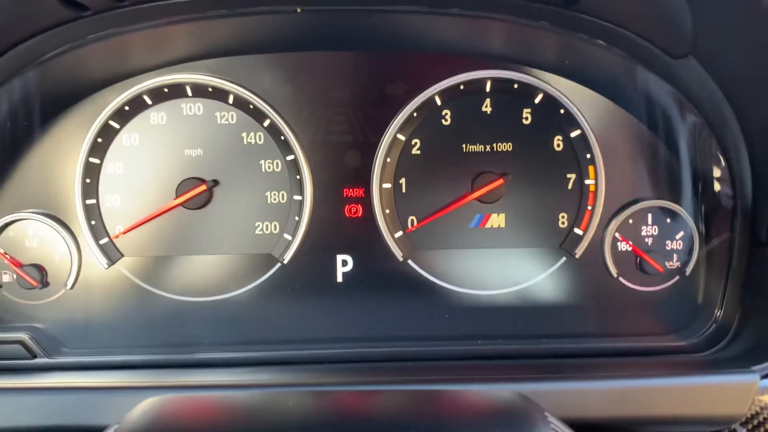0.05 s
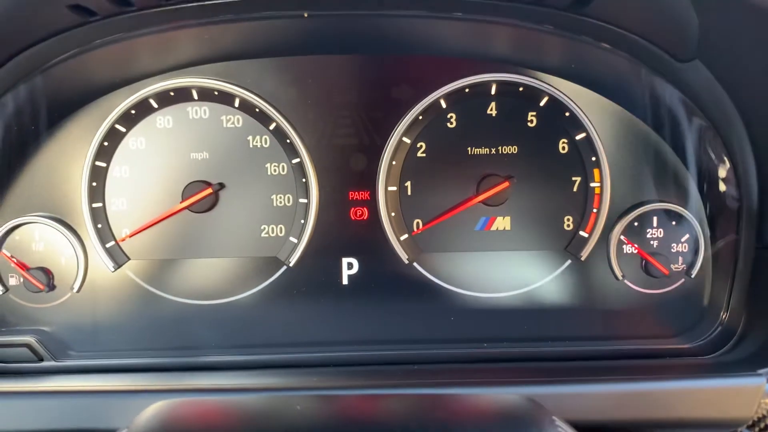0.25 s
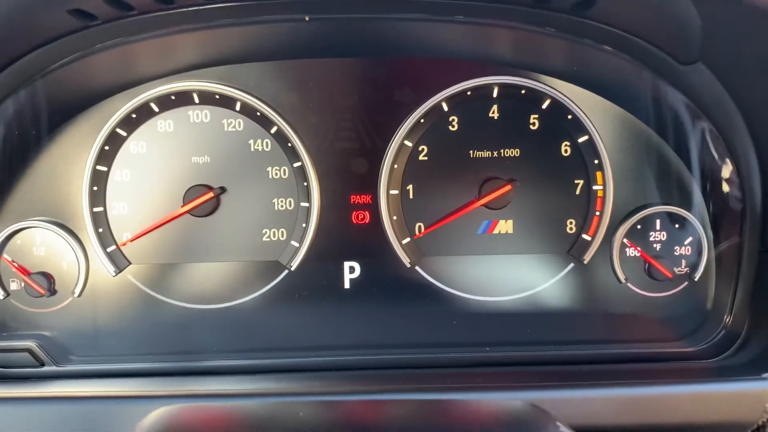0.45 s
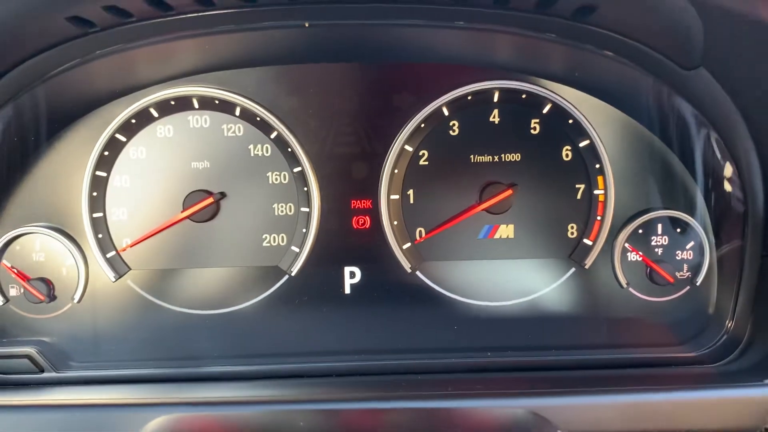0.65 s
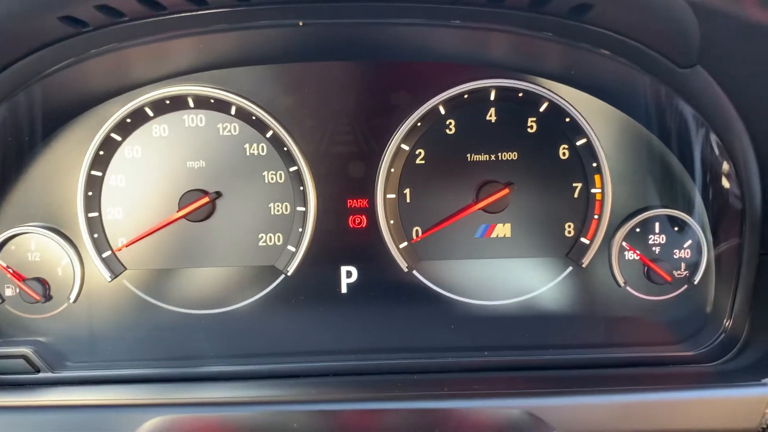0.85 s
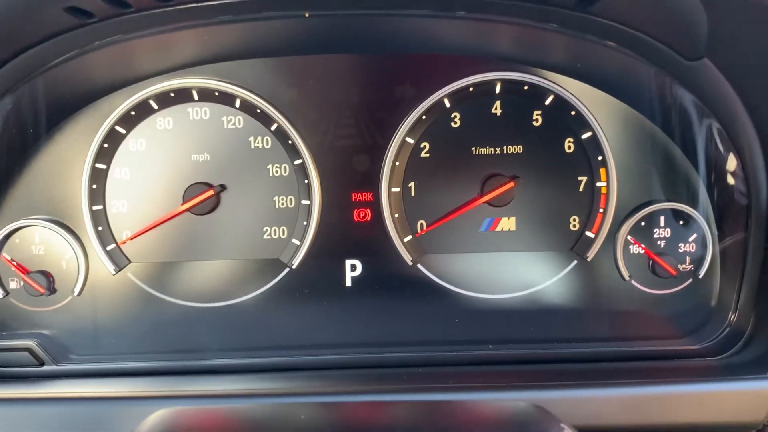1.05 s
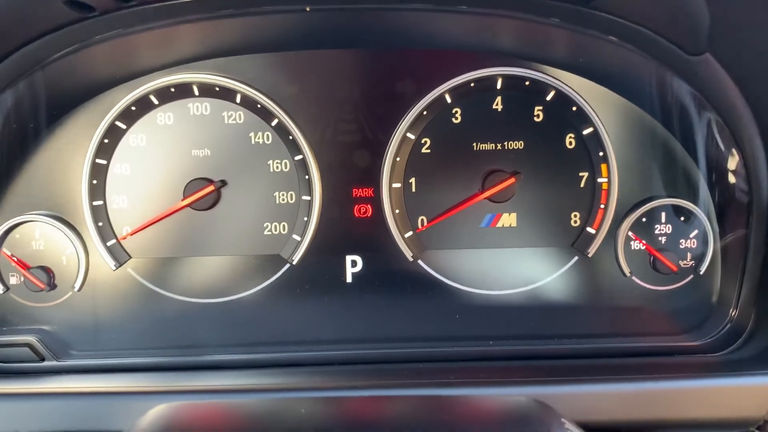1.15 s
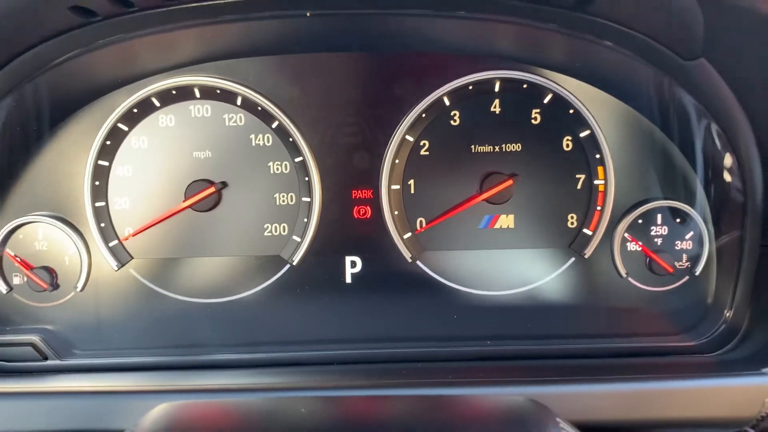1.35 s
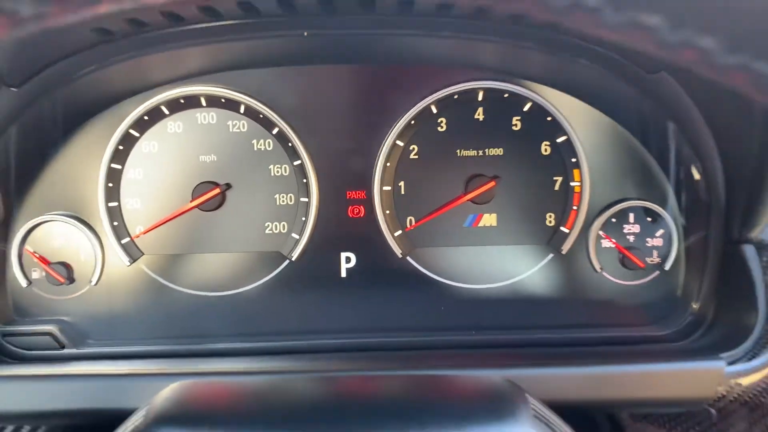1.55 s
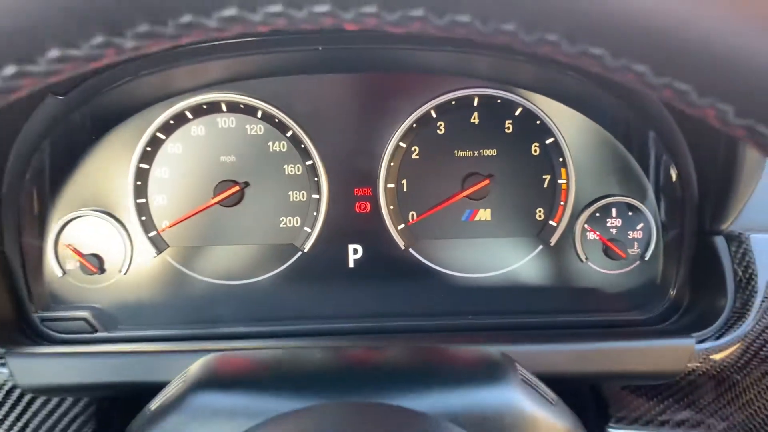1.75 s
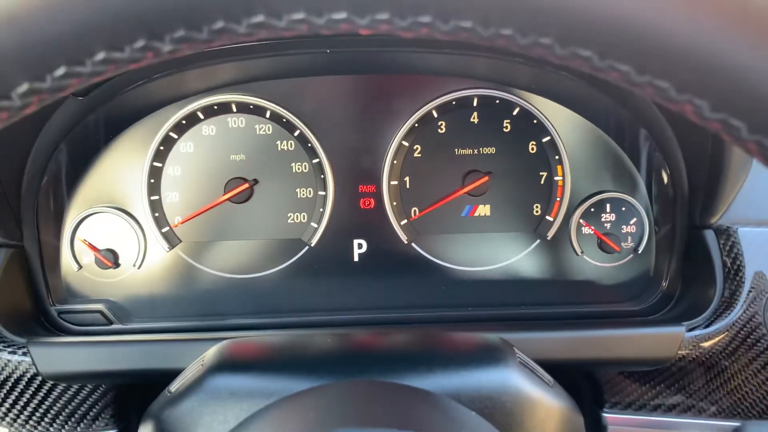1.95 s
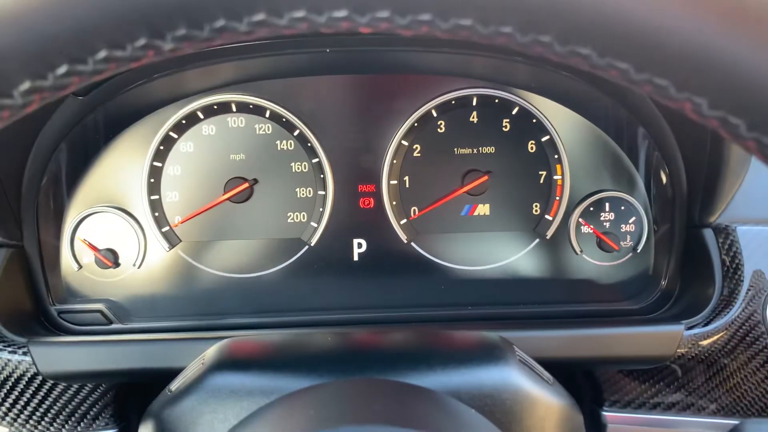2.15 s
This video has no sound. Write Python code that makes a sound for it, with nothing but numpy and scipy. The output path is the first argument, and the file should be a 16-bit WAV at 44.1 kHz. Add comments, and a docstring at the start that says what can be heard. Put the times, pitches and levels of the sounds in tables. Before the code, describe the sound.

Close plastic clacks and clicks come from a lever handled in a small, padded car cabin. A faint sleeve swish leads into a thump, clacks, a short slide and a final click, then soft knocks and low hum.

```python
"""A sleeve swishes past inside a parked car. A plastic lever and its latch release with a thump and
two clacks; the part slides briefly along a guide and clicks into its socket; a few soft knocks follow.
Each contact rings the part it strikes and scatters off the close cabin surfaces, while pushes boom the
trim panel. Cloth and slide are rubbing noise that catches and slips. Underneath, a low hum, a rumble
and faint hiss fill the small, padded cabin."""
import sys
import numpy as np
from scipy import signal
from scipy.io import wavfile

SR = 44100
rng = np.random.default_rng(int(sys.argv[2]) if len(sys.argv) > 2 else 0)


def transcribe(u):
    """Save the signal u as a 16-bit wav file named by the first command-line argument.

    u: samples, shape (n,) or (channels, n), limited to [-1, 1]; the rate is SR.
    q: integer samples, one column per channel.
    """
    v = np.clip(np.atleast_2d(u).T, -1, 1)
    q = np.round(v * 32767).astype(np.int16)
    wavfile.write(sys.argv[1], SR, q)


N = 97020
TIME = np.arange(N) / SR

# Plastic contacts: start_s, part, knock_db, clack_db, edge_db, tick_db, t60_s, edge_hz, edge_ring_db
CONTACTS = [(0.2553, "lever", -46.5, -37, -41, -53.5, 0.1, 2850, 8),
            (0.2655, "lever", -48, -47.5, -51, -63, 0.036, 1405, 7.5),
            (0.282, "lever", -50, -52, -80, -83, 0.049, 1420, 1),
            (0.2984, "latch", -41, -35, -38.5, -39.5, 0.04, 1745, -3),
            (0.3013, "latch", -46, -44, -39.5, -42.5, 0.035, 3560, 0),
            (0.3072, "latch", -45, -63, -42, -56, 0.1, 4020, 5.5),
            (0.384, "guide", -47, -66, -80, -90, 0.087, 1090, 9.5),
            (0.4278, "guide", -56, -34, -45, -50, 0.053, 2040, -1.5),
            (0.434, "guide", -62, -44, -53, -59, 0.059, 1480, 2),
            (0.465, "guide", -74, -54, -72, -68, 0.024, 2110, -1),
            (0.4758, "guide", -53, -53.5, -76, -80, 0.03, 2200, -8),
            (0.486, "guide", -55.5, -49, -59.5, -79, 0.1, 1500, 5),
            (0.529, "guide", -51.5, -68, -76, -90, 0.093, 970, 1),
            (0.559, "guide", -80, -70, -70, -81, .05, 2900, 7),
            (0.632, "socket", -51, -35, -43.5, -56, 0.084, 2550, 2.5),
            (0.7765, "socket", -53, -58, -78.5, -77, 0.1, 936, 7),
            (0.815, "socket", -57, -70, -70, -80, 0.24, 1045, 11.5),
            (0.9319, "socket", -51.5, -53.5, -105, -86, 0.085, 760, 3),
            (0.980, "socket", -61.5, -72.5, -97, -92, 0.036, 830, 8)]
# Where knock, clack, edge and tick sit in the spectrum: centre_hz
REGISTERS = [600, 2000, 4500, 9000]
# The voice of each part (lever, latch, guide, socket): pitch_hz, level_db, t60_s
PART_MODES = { "lever": [(438, 5.5, 0.05), (570, 0, 0.075), (787, 0, .1), (1080, -7.5, 0.15),
              (1346, -0.5, 0.13), (1680, -4.5, .08), (2244, -4, .07), (2570, -4, 0.05), (2920, -15, 0.06),
              (3270, -7, 0.043), (3770, -4, .08), (4700, -10.5, 0.16)], "latch": [(616, 2, 0.035),
              (753, -5, 0.068), (1400, -2, 0.065), (1470, -3, .08), (1780, -16, 0.037), (2072, -0.5, 0.04),
              (2230, -5, .045), (2600, -7, 0.037), (3400, -6, .05), (3546, -2.5, 0.051),
              (4130, -7.5, 0.043), (5650, -2, .045), (8000, -10, 0.066), (9170, -2.5, 0.035),
              (13100, -6, .025), (13900, -11, .02)], "guide": [(936, 1, 0.054), (1398, 2, 0.068),
              (1518, 2.5, .055), (1765, -7, 0.049), (2067, -2.5, 0.054), (2190, -9, 0.076),
              (2438, -8, 0.082), (2780, -9, 0.049), (3480, -12, 0.046), (4000, -2.5, 0.063),
              (4760, -5.5, 0.064), (5230, -9, 0.055)], "socket": [(430, -6.5, 0.12), (772, 3.5, 0.067),
              (1004, -5, 0.082), (1286, -8, 0.044), (1411, -5.5, 0.089), (1650, -4, 0.043),
              (1945, -8.5, .05), (2158, -0.5, 0.05), (2337, -4, .055), (2880, -2.5, 0.062),
              (3360, -15, 0.05), (3670, -9, 0.043), (4400, -7, 0.066), (6300, 5, 0.03)]}
# Stereo placement of the contacts: frequency_hz, left_minus_right_db
CONTACT_PAN = [(300, 1), (800, 4.5), (1400, 2), (2300, 4.5), (4500, -1), (10000, -2.5)]
def plastic_rings(chatter_s=0.001575, edge_t60_s=0.037, lag_s=0.00018, max_lag_cycles=0.22):
    """Each contact rings the part it strikes; the touching edge hits just after and adds its own note."""
    rings = []
    for part, modes in PART_MODES.items():
        for hz, db, t60 in modes:
            rings.append((hz, from_db(db) * ring(strikes(part, hz), hz, t60)))
    for k, (start_s, *_, hz, db) in enumerate(CONTACTS):
        edge_hit = signal.unit_impulse(N, int((start_s + chatter_s) * SR))
        rings.append((hz, from_db(db) * strengths(hz)[k] * ring(edge_hit, hz, edge_t60_s)))
    out = 0
    for hz, left in rings:
        right = np.interp(TIME - min(lag_s, max_lag_cycles / hz), TIME, left)  # arrives a little later
        out = out + pan(at_hz(CONTACT_PAN, hz)) * [left, right]
    return out


def strengths(hz):
    """How hard each contact excites this frequency."""
    return from_db([at_hz(list(zip(REGISTERS, levels)), hz) for _, _, *levels, _, _, _ in CONTACTS])


def strikes(part, hz, settle_s=0.002):
    """One impulse per contact on this part, randomly late and signed, so its modes start one by one."""
    train = np.zeros(N)
    for (start_s, struck, *_), strength in zip(CONTACTS, strengths(hz)):
        wait, side = rng.random(2)
        if struck == part:
            train[int((start_s + settle_s * wait) * SR)] = strength * np.sign(side - .5)
    return train


# The plastic tone of every noise burst: frequency_hz, level_db
PLASTIC_EQ = [(250, 0.5), (500, 1.5), (770, 1.5), (1150, 0.5), (1500, 4), (2100, 2), (2800, 4.5), (4000, 3),
              (5600, 0), (7000, 0), (8800, 8), (10300, 7), (13500, -26), (15500, -18)]
# Stereo width of the bursts and the rubbing: frequency_hz, left_right_likeness
CONTACT_WIDTH = [(250, -0.035), (700, 0.97), (1400, -0.02), (4000, -0.066), (9000, 0.15)]
def plastic_scatter(gain_db=-4.5, rise_s=0.00042, hold_s=0.0028, tail_db=-26.5, tail_t60_s=0.42):
    """Each contact scatters off close surfaces as a noise burst, trailed by the faint cabin after-ring."""
    starts, *_, t60s, _, _ = map(np.array, zip(*CONTACTS))
    ages = np.maximum(TIME - starts[:, None], 0)
    rise = np.minimum(ages / rise_s, 1)
    tail_power = from_db(tail_db - 60 * ages / tail_t60_s) ** 2
    decay = np.log(1e6) * np.maximum(ages - hold_s, 0) / t60s[:, None]
    out = 0
    for hz, noise in noise_bands(CONTACT_WIDTH, PLASTIC_EQ[0][0]):
        damping = max(hz / 2000, 1) ** 0.087  # treble dies sooner
        burst_power = np.exp(-np.minimum(decay * damping, 20))
        envelope = np.sqrt(strengths(hz) ** 2 @ (rise * (burst_power + tail_power)))
        gain = from_db(gain_db + at_hz(PLASTIC_EQ, hz)) / 2
        out = out + gain * pan(at_hz(CONTACT_PAN, hz)) * envelope * rms_one(noise)
    return out


# Pushes on the trim: centre_s, level_db, contact_s, ring_time_ratio
PUSHES = [(0.1988, -23.5, 0.0081, 2.5), (0.2494, -23, 0.0025, 0.71), (0.2545, -20.5, 0.0033, 0.78),
          (0.2612, -20, 0.0053, 1.43), (0.278, -31, 0.0052, 0.27), (0.3018, -27, 0.0042, 0.48),
          (0.308, -9.5, 0.0063, 0.08), (0.319, -42, 0.0017, 1.5), (0.3315, -23.5, 0.0065, 0.43),
          (0.640, -44.5, 0.0023, 1.3)]
# The boom of the trim panel: pitch_hz, level_db, t60_s
TRIM_MODES = [(62, -19, 0.073), (129.3, 2.5, 0.068), (188, -8, 0.073), (260.6, -0.5, 0.059),
              (417.4, -13.5, 0.18), (572, -14, 0.076)]
def trim_thumps():
    """Soft pushes set the trim panel booming; a firm grip damps it."""
    boom = 0
    for centre_s, push_db, contact_s, ring_time_ratio in PUSHES:
        push = np.cos(np.pi * np.clip((TIME - centre_s) / contact_s, -.5, .5)) ** 2
        push /= push.sum()
        for hz, mode_db, t60 in TRIM_MODES:
            boom = boom + from_db(push_db + mode_db) * ring(push, hz, t60 * ring_time_ratio)
    return pan(2.5) * low_cut(boom, hz=73)  # the thumps' deepest bass is rolled off


# The slide's fader moves: time_s, level_db
SLIDE_FADER = [(0.245, -73.5), (0.272, -53), (0.33, -55.5), (0.415, -58.5), (0.45, -49), (0.49, -60.5),
               (0.52, -68.5), (0.60, -68.5), (0.72, -71.5), (0.95, -79)]
# The tone of the part on its guide: frequency_hz, level_db
SLIDE_EQ = [(180, -36), (300, -12.5), (1080, -2), (1250, -22), (1520, -2), (1650, -7), (4930, -13.5),
            (11000, -28), (13800, -39), (15000, -61)]
def guide_slide():
    """The part rubs along its guide between the clacks."""
    return fader(SLIDE_FADER) * friction(SLIDE_EQ, grain_db=-2.5, grain_hz=112) * pan(2.2)


# The bright tone of cloth: frequency_hz, level_db
SLEEVE_EQ = [(1500, -16), (3000, -4), (4700, -1), (7200, 1), (8300, 2), (9500, -1), (11300, -1),
             (13200, -1), (15000, -1)]
def sleeve_brush(start_s=0.0224, attack_s=0.011, hold_s=0.036, release_s=0.04, gain_db=-56.5):
    """Cloth lands at about half strength and rubs past in one short swish."""
    corners = start_s + np.cumsum([0, attack_s, hold_s, release_s])
    envelope = np.interp(TIME, corners, [0.49, 1, 1, 0], left=0)
    return from_db(gain_db) * envelope * friction(SLEEVE_EQ, grain_db=2.0, grain_hz=248)


# The hum's swells and dips: time_s, level_db
HUM_FADER = [(0.0, -50), (0.08, -51.5), (0.12, -65), (0.26, -46), (0.64, -46), (0.67, -71.5), (0.99, -38.5),
             (1.06, -62), (1.11, -42.5), (1.18, -46), (1.2, -50), (1.36, -43.5), (1.39, -54.5),
             (1.49, -42.5), (1.52, -52), (2.2, -49)]
def cabin_hum(pitch_hz=49, wander_hz=2.67):
    """One low tone that wavers in pitch as it swells and dips."""
    phase = 2 * np.pi * np.cumsum(pitch_hz + wander_hz * drift(rate_hz=6.03)) / SR
    return fader(HUM_FADER) * rms_one(np.sin(phase))


# The bass-heavy room tone: frequency_hz, level_db
AIR_EQ = [(22, -25), (50, -9.5), (82, -11), (113, -11.5), (145, -16.5), (218, -25), (408, -35.5),
          (765, -39), (1300, -46), (2000, -49.5), (3200, -58), (6500, -65), (10000, -57.5), (15000, -63)]
# The rumble's fader moves: time_s, gain_db
RUMBLE_FADER = [(0, -49), (0.2, -48), (0.4, -42.5), (0.52, -50), (0.7, -48), (1.1, -50), (1.75, -48),
                (1.87, -45), (1.98, -50), (2.2, -53)]
# Room tone width, narrow in the bass and wide on top: frequency_hz, left_right_likeness
AIR_WIDTH = [(40, 0.93), (150, 0.92), (300, 0.65), (600, 0.64), (3000, 0.59), (12000, 0.24)]
def cabin_air(rumble_top_hz=400, hiss_gain_db=-52.5):
    """A bed of noise: the rumble rises and falls under a faint, steady hiss."""
    bands = [(hz, from_db(at_hz(AIR_EQ, hz)) * noise) for hz, noise in noise_bands(AIR_WIDTH, AIR_EQ[0][0])]
    rumble_gain, hiss_gain = fader(RUMBLE_FADER), from_db(hiss_gain_db)
    air = sum((rumble_gain if hz < rumble_top_hz else hiss_gain) * noise for hz, noise in bands)
    return air / np.std(sum(noise for _, noise in bands))


# Treble peaks and dips of the microphone ports: centre_hz, gain_db, width_hz
PORT_EQ = [(7240, -4.5, 1500), (8440, 3.5, 2000), (11490, -32.5, 690), (13100, 3.5, 3600)]
def microphone(x):
    """The ports colour the treble, one bell filter for each peak or dip."""
    for hz, db, width_hz in PORT_EQ:
        gain, angle = from_db(db / 2), 2 * np.pi * hz / SR
        width, tuning = np.sin(angle) * width_hz / hz / 2, -2 * np.cos(angle)
        zeros = [1 + width * gain, tuning, 1 - width * gain]
        poles = [1 + width / gain, tuning, 1 - width / gain]
        x = signal.lfilter(zeros, poles, x)
    return x


def ring(force, hz, t60):
    """One mode: a unit click starts a dying sine of height 1."""
    decay, angle = from_db(-60 / (t60 * SR)), 2 * np.pi * hz / SR
    return signal.lfilter([0, np.sin(angle)], [1, -2 * decay * np.cos(angle), decay ** 2], force + 1e-18)


def friction(eq, grain_db, grain_hz):
    """Rubbing noise that catches and slips; rms 1."""
    rub = sum(from_db(at_hz(eq, hz)) * noise for hz, noise in noise_bands(CONTACT_WIDTH, eq[0][0]))
    return rms_one(rub * from_db(grain_db * drift(grain_hz)))


def noise_bands(likeness, lowest_hz):
    """Third-octave bands of stereo noise, each with its centre frequency."""
    edges = 20 * 2 ** (np.arange(30) / 3)
    white = rng.standard_normal((2, 2, N))
    for k, (low, high) in enumerate(zip(edges, edges[1:])):
        if high > lowest_hz:
            hz = np.sqrt(low * high)
            band = signal.butter(2, [low, high], "band", fs=SR, output="sos")
            mid, side = signal.sosfilt(band, white[k % 2])
            alike = np.clip(at_hz(likeness, hz), -1, 1)
            yield hz, np.sqrt(1 + alike) * mid + np.sqrt(1 - alike) * side * [[1], [-1]]


def drift(rate_hz, step=40):
    """A smooth random wander with rms 1, drawn once every step samples."""
    pole = np.exp(-2 * np.pi * rate_hz * step / SR)
    white = rng.standard_normal(N // step + 2002)
    slow = signal.lfilter([1], [1, -2 * pole, pole ** 2], white)[2000:]
    return np.interp(np.arange(N) / step, np.arange(len(slow)), rms_one(slow))


def from_db(db):
    """Decibels to gain."""
    return 10 ** (np.asarray(db) / 20)


def rms_one(x):
    """Scale to rms 1."""
    return x / np.sqrt(np.mean(x ** 2) + 1e-20)


def at_hz(points, hz):
    """Read a curve on a log-frequency axis."""
    frequencies, values = np.transpose(points)
    return np.interp(np.log(hz), np.log(frequencies), values)


def fader(points):
    """Gain over time from time_s, level_db points."""
    return from_db(np.interp(TIME, *np.transpose(points)))


def pan(db):
    """Left and right gains, with the left louder by db."""
    return from_db(np.array([[db], [-db]]) / 2)


def low_cut(x, hz):
    """Roll off the bass below hz."""
    return signal.sosfilt(signal.butter(2, hz, "high", fs=SR, output="sos"), x)


def scene():
    """The mechanism and the sleeve up front, over a cabin bed that leans slightly left."""
    foreground = plastic_scatter() + plastic_rings() + trim_thumps() + guide_slide() + sleeve_brush()
    return foreground + pan(2.5) * (cabin_air() + cabin_hum())


def record(dry):
    """After the microphone, the deepest bass is rolled off and the top is cut steeply."""
    high_cut = signal.ellip(10, .1, 80, 15200, fs=SR, output="sos")
    return signal.sosfilt(high_cut, low_cut(microphone(dry), hz=26.5))


dry = scene()
out = record(dry)
transcribe(out)
```